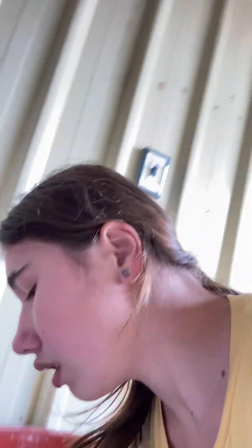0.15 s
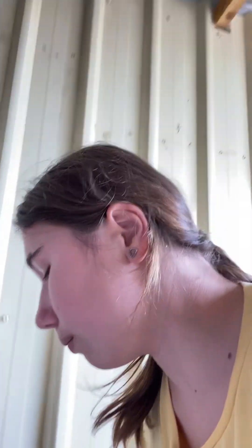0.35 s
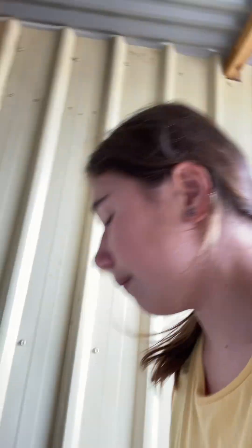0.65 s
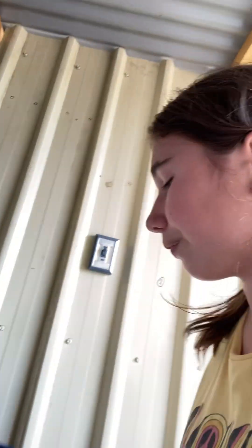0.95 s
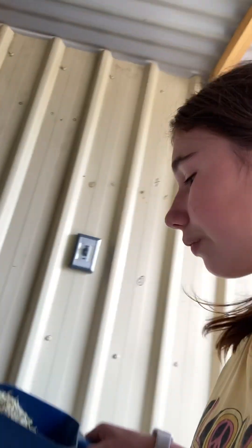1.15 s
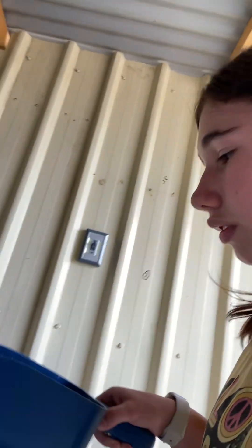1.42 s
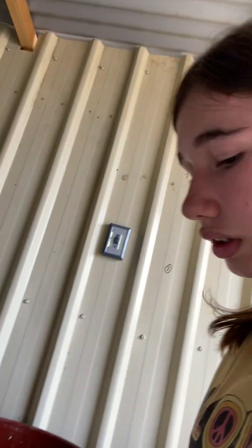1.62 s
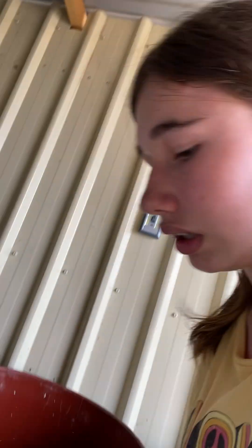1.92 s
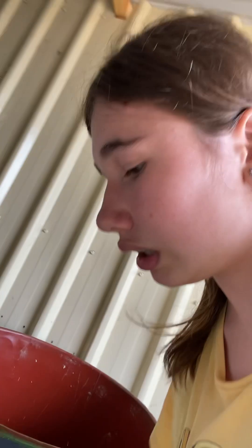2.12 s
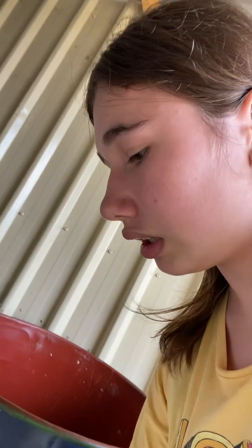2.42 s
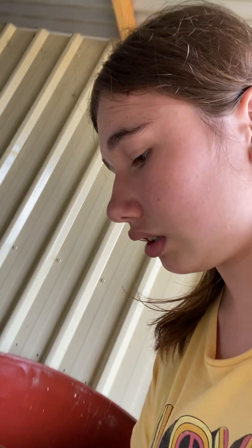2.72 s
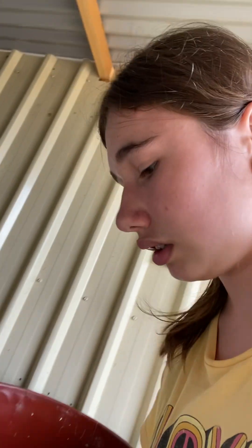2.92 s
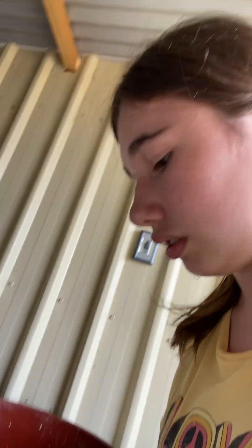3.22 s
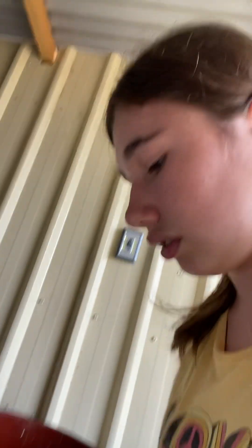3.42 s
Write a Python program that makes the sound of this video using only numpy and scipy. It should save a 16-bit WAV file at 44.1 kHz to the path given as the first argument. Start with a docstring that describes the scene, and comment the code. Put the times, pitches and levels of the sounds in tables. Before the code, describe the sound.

Close up in a metal shed, chaff rustles brightly under a scraping scoop, quietens for knocks and low rumble, slides into a plastic tub with a thump, then the dropped scoop rattles with a low thud.

```python
"""Dry chaff rustles and crackles, bumps and slides into a plastic feed tub in a metal shed.
A scoop scrapes, drags and squeaks, then drops with a clatter and a low thud over rumbling air.
The chaff is random impulses and tuned crackles through filters; blows excite banks of resonances.
Drag and squeak are noise through resonances of moving pitch; the air is filtered noise, and a
decaying noise tail gives the ring of the shed."""
import sys
import numpy as np
from scipy import signal
from scipy.fft import rfft, irfft, next_fast_len
from scipy.io import wavfile
from scipy.ndimage import uniform_filter1d

SR = 44100
rng = np.random.default_rng(int(sys.argv[2]) if len(sys.argv) > 2 else 0)


def unload_wav(signal):
    """Save mono or channel-first audio to the path in sys.argv[1] as 16-bit WAV at rate SR, clipped to [-1, 1]."""
    wavfile.write(
        sys.argv[1],
        SR,
        np.round(np.clip(np.atleast_2d(signal).T, -1, 1) * 32767).astype(np.int16),
    )


N = 156555
T = np.arange(N) / SR  # time in seconds

# spectral density of stirred stalks: frequency_hz, density_db (relative)
STIR_SPECTRUM = [(100, -59), (220, -14), (500, -7.5), (900, -8), (1600, -4.5), (2500, -0.5), (4600, -2.5),
                 (7500, 0), (10000, -0.5), (12000, -3)]


def amp(db):
    """The decibel law: 20 dB is a tenfold amplitude."""
    return 10 ** (np.asarray(db) / 20)


def unit(x):
    """Power normalisation: scales a signal to rms 1."""
    return x / np.sqrt(np.mean(x ** 2) + 1e-20)


def read(points, hz):
    """Interpolates a spectrum along a logarithmic frequency axis."""
    f, value = np.transpose(points)
    return np.interp(np.log(hz + 1), np.log(f + 1), value)


def level(points):
    """Amplitude envelope: straight lines in dB, falling 200 dB per second outside the span."""
    s, db = np.transpose(points)
    outside_s = np.maximum(0, np.maximum(s[0] - T, T - s[-1]))
    return amp(np.interp(T, s, db) - 200 * outside_s)


def add(mix, s, sound):
    """Superposition: adds a sound into the mix at a time in seconds."""
    part = mix[:, max(0, round(s * SR)):][:, :sound.shape[-1]]
    part += sound[..., :part.shape[1]]


def colour(x, points):
    """Minimum-phase filtering: the Hilbert transform of log gain supplies a causal phase."""
    size = 4096
    log_gain = np.log(amp(read(points, abs(np.fft.fftfreq(size, 1 / SR)))))
    response = np.exp(np.conj(signal.hilbert(log_gain)))
    taps = np.fft.ifft(response).real[:size // 2]
    return signal.fftconvolve(x, taps[None], axes=1)[:, :x.shape[1]]


def ring(x, modes):
    """Modal superposition: parallel resonances, each with a frequency, width and level."""
    return sum(amp(db) * signal.lfilter(*signal.iirpeak(hz, hz / width, SR), x)
               for hz, width, db in modes)


def glide(x, hz, width):
    """Heterodyning: two equal poles in a turning frame resonate along a pitch curve, at rms 1."""
    turn = np.exp(2j * np.pi * np.cumsum(hz) / SR)
    radius = np.exp(-np.pi * width / SR)
    baseband = signal.lfilter([1], np.poly([radius, radius]), x / turn)
    return unit((turn * baseband).real)


def snaps():
    """Shot noise: thousands of tiny stalk snaps per second, their strength swelling in clumps."""
    snaps_per_s, clump_db, clump_s = 9000, 1.3, 0.016
    hits = (rng.random((2, N)) < snaps_per_s / SR) * rng.choice([-1, 1], (2, N))
    clumps = unit(uniform_filter1d(rng.standard_normal(N), max(2, int(clump_s * SR))))
    return hits * amp(clump_db * clumps)


def husks():
    """Impulse response: sparse hits of many sizes ring coarse husks for a few cycles each."""
    husks_per_s, spread_db, quality = 300, 3, 2.8
    pitches = np.geomspace(2150, 10800, 10)  # Hz
    size = amp(spread_db * np.minimum(rng.exponential(size=(2, N)), 3.5))
    chance = husks_per_s / len(pitches) / SR
    crackle = np.zeros((2, N))
    for hz in pitches:
        hits = size * (rng.random(size.shape) < chance)
        crackle += ring(hits, [(hz, hz / quality, 0)]) / np.sqrt(hz)
    return unit(crackle)


def ticks():
    """Transient excitation: single stiff stalks snap or land as exponentially decaying noise."""
    # single stalks: start_s, peak_db
    stalks = [(0.096, -43), (0.1587, -30), (.3326, -33), (0.7726, -24), (0.953, -32), (2.3494, -33),
              (2.95, -34.5), (3.017, -41)]
    decay_s = .0011
    out = np.zeros((2, N))
    for s, db in stalks:
        tick = colour(rng.standard_normal(out.shape) * np.exp(-T / decay_s), STIR_SPECTRUM)
        add(out, s, amp(db) * tick / abs(tick).max())
    return out


def scrape():
    """Resonant filtering: chaff snaps excite the scoop's wall as it scrapes through."""
    # strength of the scrape: time_s, level_db
    strength = [(0, -49.5), (.19, -59.5), (.26, -46.5), (.45, -49), (.58, -52.5), (.66, -47), (.92, -59.5),
                (1.05, -73)]
    # wall resonances, passed through twice: frequency_hz, width_hz, level_db (each for one pass)
    wall_modes = [(2320, 570, 1.1), (2870, 710, 1.4)]
    return level(strength) * unit(ring(ring(snaps(), wall_modes), wall_modes))


def chaff():
    """Granular friction: many small contacts rustle as stalks are stirred, then slide into the tub."""
    # stirring: time_s, level_db (before its gain below)
    stir_points = [(0, -47.5), (.12, -46), (.38, -40.5), (.56, -45), (.9, -44.5), (1.0, -49), (1.14, -51.5),
                   (1.2, -57), (1.28, -54), (1.39, -59.5), (1.47, -54.5), (1.58, -59.5), (1.72, -59.5),
                   (1.78, -63.5), (1.9, -51.5), (1.97, -53.5), (2.03, -64.5), (2.12, -70.5)]
    # pouring: time_s, level_db (before its gain below)
    pour_points = [(2.17, -65), (2.28, -54), (2.385, -54.5), (2.41, -39.5), (2.53, -42.5), (2.56, -47.5),
                   (2.65, -55.5), (2.76, -63.5), (2.85, -70), (2.94, -58.5), (3.08, -62.5), (3.11, -43.5),
                   (3.23, -57.5), (3.28, -57.5), (3.365, -70), (3.385, -56), (3.43, -65), (3.49, -93.5),
                   (3.55, -92)]
    # spectral density of poured stalks: frequency_hz, density_db (relative)
    pour_spectrum = [(100, -8), (900, -11), (2200, -3), (5000, -6)]
    stir_gain_db, pour_gain_db, husk_db = 2, 3.5, -10.5
    stir, pour = amp(stir_gain_db) * level(stir_points), amp(pour_gain_db) * level(pour_points)
    stirred = stir * unit(colour(snaps(), STIR_SPECTRUM))
    poured = pour * unit(colour(snaps(), pour_spectrum))
    coarse = amp(husk_db) * (stir + pour) * husks()
    return stirred + poured + coarse + ticks() + scrape()


def rumble():
    """Turbulent pressure: moving air buffets both microphones alike, as low filtered noise."""
    # air movement: time_s, level_db
    gusts = [(0, -59.5), (1.08, -67), (1.16, -56), (1.36, -60), (1.48, -45), (1.68, -42.5), (1.79, -51.5),
             (2.2, -62), (2.35, -49), (3.08, -63), (3.13, -45), (3.55, -58)]
    # its spectral density: frequency_hz, density_db (relative)
    spectrum = [(20, -22), (34, -7), (55, 3.5), (150, -14.5), (600, -67)]
    return level(gusts) * unit(colour(rng.standard_normal((1, N)), spectrum))


def still_air():
    """Stationary noise: the quiet air of the shed, steady in power."""
    # spectral density: frequency_hz, density_db (relative)
    spectrum = [(130, -6), (280, -12), (700, -9), (10000, -37.5)]
    air_db = -63
    return amp(air_db) * unit(colour(rng.standard_normal((2, N)), spectrum))


def knocks(rows, body, modes):
    """Impact excitation: each blow rings the plastic's modes beside a short chatter of its walls."""
    knock_db, wall_db, strike_db = 14.5, 1, 3  # all knocks; wall chatter; ringing modes
    rise_share = 0.055  # a long, soft contact also starts more gently
    spread_s = 0.00192  # the shared and the opposed part of the ring each lag by a random time up to this
    tick_db = -4.5  # top end of a blow, relative to its crack
    mode_width_hz, mode_loss = 13.3, 0.013  # base width, plus this share of the mode's frequency
    chatter, blows = np.zeros((2, N)), np.zeros((2, N))
    t = np.arange(SR // 3) / SR
    for s, db, thump, crack, contact in rows:
        envelope = (1 - np.exp(-t / (rise_share * contact))) * np.exp(-t / contact)
        burst = rng.standard_normal((2, len(t))) * envelope
        lags = rng.random(2) * spread_s
        blow = np.array([signal.unit_impulse(len(t), int(lag * SR)) for lag in lags])
        # spectrum of the contact: Hz, dB
        hardness = [(380, thump), (520, 0.0099), (950, 0.01),
                    (1600, crack), (2800, crack), (5500, crack + tick_db)]
        add(chatter, s, amp(db) * colour(burst, hardness))
        add(blows, s, amp(db) * np.linalg.norm(burst[0]) * colour(blow, hardness))
    ringing = ring(blows, [(hz, mode_width_hz + mode_loss * hz, db) for hz, db in modes])
    return amp(knock_db) * colour(amp(wall_db) * chatter + amp(strike_db) * ringing, body)


def bumps():
    """Modal excitation: bumps against the bin and the tub ring the tub's modes."""
    # blows: start_s, body_db (before the knock gains), thump_db and crack_db (relative to the body),
    # contact_s (decay time constant)
    blows = [(.24, -66, 13, 17, 0.051), (.275, -60.5, 8, 10, 0.077), (.54, -64.5, -2, -13, 0.021),
             (1.15, -68, 3.5, 15.5, 0.024), (1.356, -58.5, -7, 16.5, 0.0066), (1.506, -52.5, 3, 2, 0.01),
             (1.526, -51, 5, -2.5, 0.016), (1.603, -47.5, 0, -1, 0.017), (1.66, -58.5, 8, 1, 0.02),
             (1.737, -50, -2, -8.5, 0.0029), (2.404, -43.5, 4.5, -4.5, 0.026),
             (2.423, -40.5, 0.5, -28, 0.019), (2.61, -49.5, 2.5, 1.5, 0.025), (2.69, -64, 8, 7.5, 0.072)]
    # broad spectrum of the tub: frequency_hz, density_db (relative)
    spectrum = [(25, -41), (150, 5.5), (620, -1), (2000, -0.5), (9000, -25)]
    # resonances of the tub: frequency_hz, level_db (relative)
    modes = [(151, 4.5), (243, 11.5), (334, 1), (449, 3), (624, 8.5), (727, 10), (968, -1.5)]
    return knocks(blows, spectrum, modes)


def drag():
    """Stick-slip friction: the scoop drags on the bin; its resonance shifts as the contact moves."""
    # drag along the bin: time_s, level_db, resonance_hz
    contact_path = [(1.36, -69, 605), (1.42, -51, 370), (1.475, -67, 320), (1.521, -42, 500),
                    (1.585, -65, 320), (1.612, -53, 284), (1.74, -71, 198)]
    width_hz, slips_per_s = 320, 810
    s, db, hz = np.transpose(contact_path)
    slips = rng.standard_normal((2, N)) * (rng.random(N) < slips_per_s / SR)
    return level(np.transpose([s, db])) * glide(slips, np.interp(T, s, hz), width_hz)


def squeak():
    """Frictional resonance: the scoop slips roughly on the rim, its pitch falling as the slip slows."""
    # partials: frequency_hz (at mid-squeak), width_hz (of each pole), level_db (relative)
    partials = [(2500, 380, -0.8), (3700, 290, -0.72)]
    start_s, length_s, squeak_db = 1.655, .065, -54.5
    sag = 0.14  # fall in pitch, as a share of the middle pitch
    along = np.clip((T - start_s) / length_s, 0, 1)
    bend = 1 + sag * (.5 - along)
    tone = sum(amp(db) * glide(rng.standard_normal((2, N)), hz * bend, width)
               for hz, width, db in partials)
    return amp(squeak_db) * np.sin(np.pi * along) * unit(tone)


def clatter():
    """Repeated impact: the dropped scoop bounces and settles, ringing its own modes."""
    # blows: start_s, body_db (before the knock gains), thump_db and crack_db (relative to the body),
    # contact_s (decay time constant)
    bounces = [(3.096, -28.5, -10, 11.5, 0.0086), (3.111, -29, -8.5, 9, 0.019),
               (3.119, -25.5, -1, 7.5, 0.017), (3.133, -35.5, 0, 2, 0.013), (3.157, -33, 6.5, 0, 0.0069),
               (3.173, -33.5, -4.5, 3.5, 0.028), (3.21, -39.5, 7, 11, 0.015),
               (3.252, -43.5, -1, -5.5, 0.053), (3.309, -32, 2.5, -4.5, 0.011)]
    # broad spectrum of the scoop: frequency_hz, density_db (relative)
    spectrum = [(25, -48), (110, 0), (600, 1.5), (1100, -2.5), (3700, -12.5), (5000, -19), (8500, -21),
                (12000, -46)]
    # resonances of the scoop: frequency_hz, level_db (relative)
    modes = [(118, 2), (182, 10), (247, 11), (334, 5), (391, 3), (635, 3), (745, 3.5), (900, 4), (1242, 10),
             (1536, 1), (1610, 4), (1676, 1.5), (1801, 3.5), (1971, -2), (2099, 4), (2158, 1.5), (2950, 4),
             (3795, 4)]
    return knocks(bounces, spectrum, modes)


def thud():
    """Damped oscillation: the bin takes the dropped scoop in one low, quickly dying swing."""
    start_s, pitch_hz, thud_db, t60_s = 3.112, 82.6, -23.5, 0.068
    t = np.maximum(T - start_s, 0)
    return amp(thud_db - 60 * t / t60_s) * np.sin(2 * np.pi * pitch_hz * t)


def shed(x):
    """Diffuse reverberation: convolution with random noise whose bands die at their own speeds."""
    # reverberation time: frequency_hz, t60_s
    decay = [(200, 0.36), (2500, 0.36), (12000, 0.24)]
    hz, t, z = signal.stft(rng.standard_normal((2, SR)), SR, nperseg=256)
    tail = signal.istft(z * amp(-60 * t / read(decay, hz)[:, None]), SR)[1]
    tail[:, :SR // 200] = 0  # no reflection in the first 5 ms
    return signal.fftconvolve(x, tail / np.linalg.norm(tail[0]), axes=1)[:, :N]


def stereo(x, same, left):
    """Partial coherence: shared and opposed parts set how alike left and right are per frequency."""
    size = next_fast_len(N + 4096)
    hz, (a, b) = np.fft.rfftfreq(size, 1 / SR), rfft(x, size)
    likeness = np.clip(read(same, hz), -np.sqrt(.5), 1)  # never wholly opposed
    tilt = amp(read(left, hz) / 2)
    mid, side = a * np.sqrt((1 + likeness) / 2), b * np.sqrt((1 - likeness) / 2)
    return irfft(np.array([(mid + side) * tilt, (mid - side) / tilt]), size)[:, :N]


def scene():
    """Superposition: chaff and knocks with the shed's reverberation, still air, rumble and thud."""
    # likeness of left and right, chaff then knocks: frequency_hz, # likeness (1 identical, negative opposed:
    # the very top is partly opposed)
    chaff_same = [(100, 0.87), (600, 0.38), (2700, 0.05), (7000, 0.92), (12000, -.5)]
    knock_same = [(290, 0.99), (520, 0.51), (1300, 0.23), (2700, 0.19)]
    # balance of left and right, chaff then knocks: frequency_hz, left_minus_right_db
    chaff_left = [(1000, -0.5), (2200, 3), (8000, 0)]
    knock_left = [(600, -0.5), (1200, 0.5), (3800, 2.5), (7000, 5)]
    shed_chaff_db, shed_knock_db = -12.5, -9  # reverberation relative to the direct sound
    rustle = chaff()
    plastic = bumps() + drag() + squeak() + clatter()
    rustle = rustle + amp(shed_chaff_db) * shed(rustle) + still_air()
    plastic = plastic + amp(shed_knock_db) * shed(plastic)
    pair = stereo(rustle, chaff_same, chaff_left) + stereo(plastic, knock_same, knock_left)
    return pair + rumble() + thud()


def record(dry):
    """Band limiting: a linear-phase low-pass filter leaves the sound dull above about 12 kHz."""
    edge_hz = 12300
    taps = signal.firwin(161, edge_hz, window=("kaiser", 8), fs=SR)
    return signal.oaconvolve(dry, taps[None], "same")


dry = scene()
out = record(dry)
unload_wav(out)
```